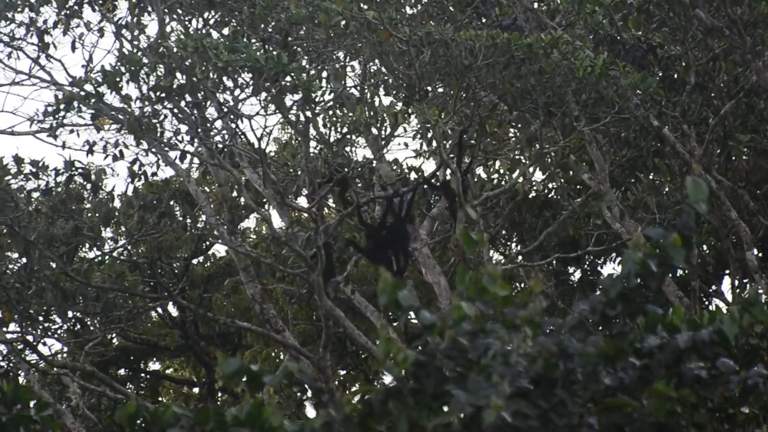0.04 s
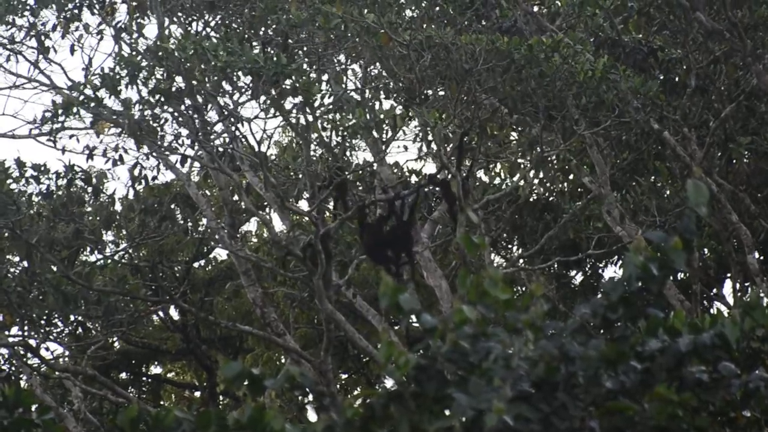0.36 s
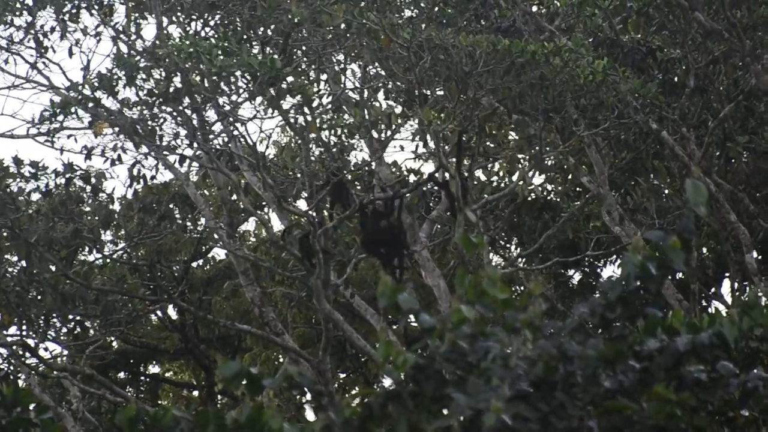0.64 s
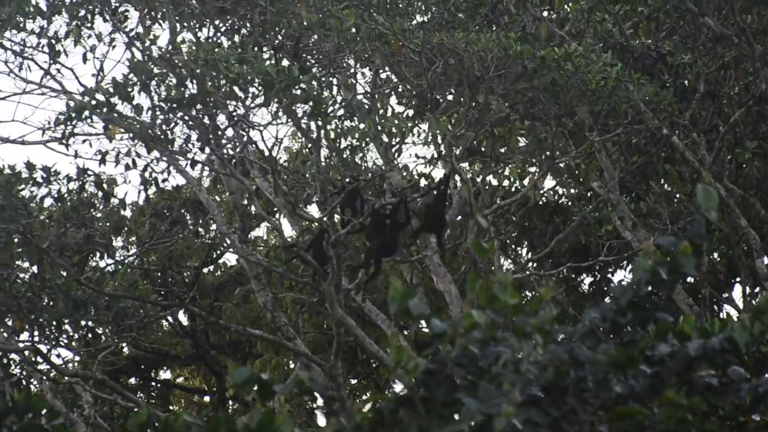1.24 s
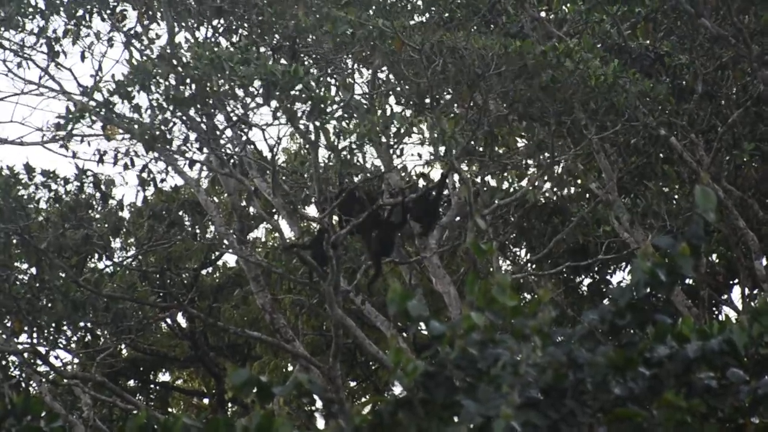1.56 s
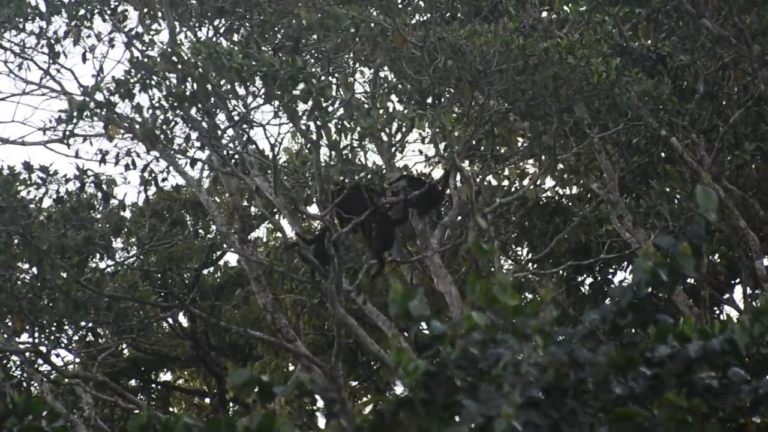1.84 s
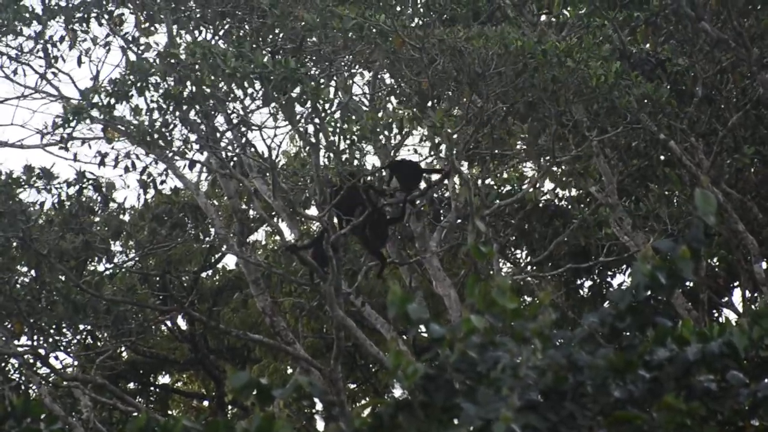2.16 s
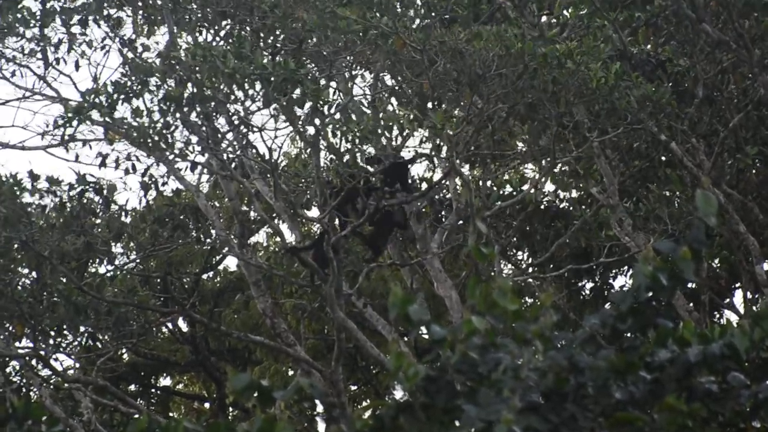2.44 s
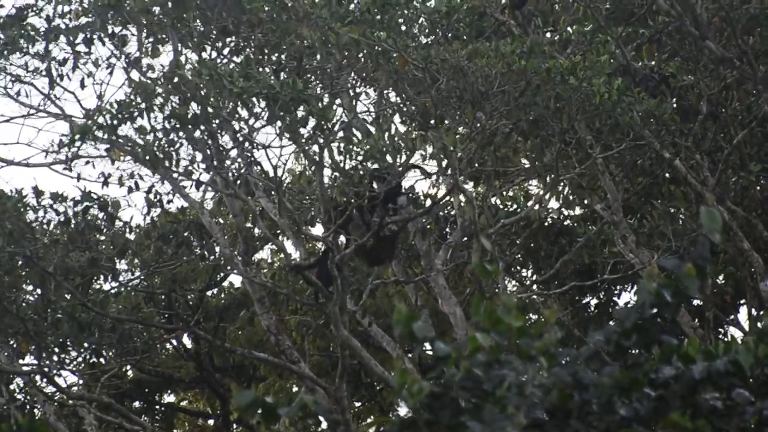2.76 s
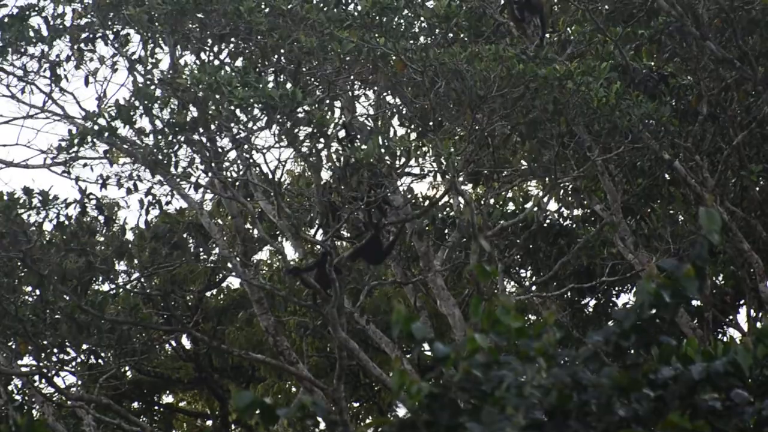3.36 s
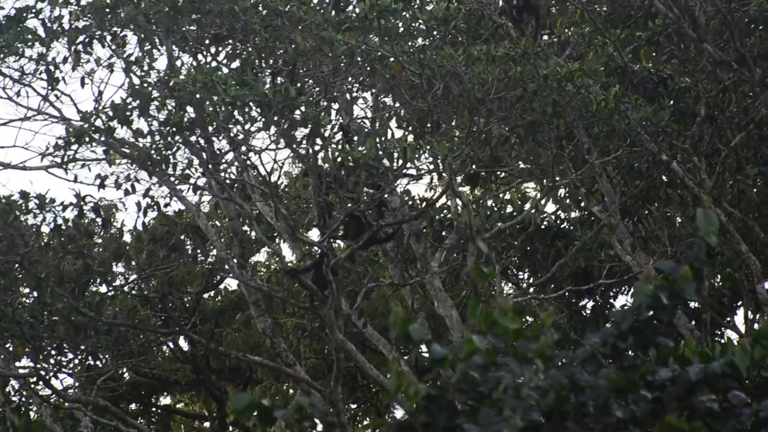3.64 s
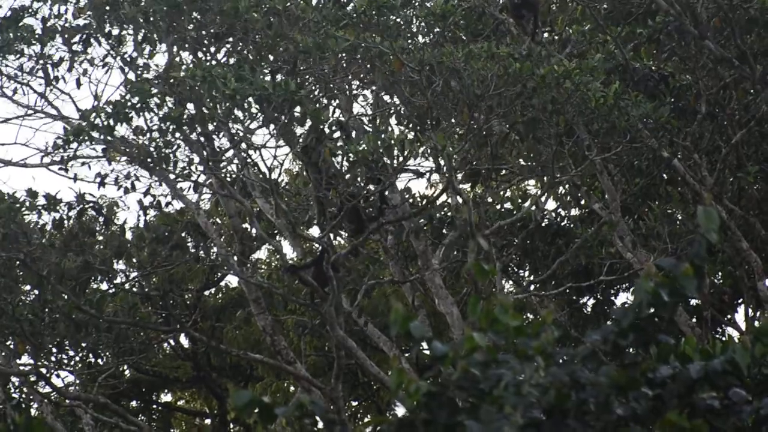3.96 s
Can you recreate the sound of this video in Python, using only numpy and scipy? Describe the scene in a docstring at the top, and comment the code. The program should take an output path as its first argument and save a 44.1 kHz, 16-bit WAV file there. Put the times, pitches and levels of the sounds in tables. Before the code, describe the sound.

Howler monkeys roaring raspily some way off in the trees, with faint bird whistles.

```python
"""Howler monkeys roar in the forest canopy some way off: irregular throat pulses and rushing air ring in
a narrow main resonance, with a rasp above it when the mouth opens. Short yelps lead in, and a second,
broader voice joins in the middle. A bird gives three thin falling whistles, a dull crash rolls
through the trees, two faint tones pass, and the forest hisses throughout."""
import sys
import numpy as np
from scipy import signal
from scipy.fft import rfft, irfft
from scipy.io import wavfile
from scipy.ndimage import uniform_filter1d

SR = 44100
rng = np.random.default_rng(int(sys.argv[2]) if len(sys.argv) > 2 else 0)


def store_wav(level_fs):
    """Save 16-bit WAV to argv[1]."""
    pcm = np.round(np.clip(np.atleast_2d(level_fs), -1, 1) * 32767)
    wavfile.write(sys.argv[1], SR, pcm.T.astype(np.int16))


N = 176400
TIME = np.arange(N) / SR
WOBBLE = .012  # wander of the vocal resonances, as a share of their frequency


def from_db(db):
    """Decibels to gain."""
    return 10 ** (np.asarray(db) / 20)


def unit_rms(x):
    """Scale to rms 1."""
    return x / np.sqrt(np.mean(x ** 2) + 1e-20)


def evened(x):
    """Hold the level steady over about a twentieth of a second."""
    return x / np.sqrt(uniform_filter1d(x ** 2, size=2200) / np.mean(x ** 2) + 1e-6)


def curve(rows, column=1):
    """Automation: straight lines through one column of timed breakpoints."""
    points = np.transpose(rows)
    return np.interp(TIME, points[0], points[column])


def swell(peak_s, width_s, db):
    """A bell-shaped swell of gain."""
    return from_db(db) * np.exp(-.5 * ((TIME - peak_s) / width_s) ** 2)


def drift(rate_hz):
    """Smooth random modulation, rms about 1."""
    hop, settle = 40, 2000
    pole = np.exp(-2 * np.pi * rate_hz * hop / SR)
    noise = rng.standard_normal(N // hop + settle + 2)
    slow = signal.lfilter([1], [1, -2 * pole, pole * pole], noise)[settle:]
    return np.interp(np.arange(N) / hop, np.arange(len(slow)), unit_rms(slow))


def coloured(spectrum):
    """Noise shaped by (frequency [Hz], level [dB]) points, rms 1."""
    hz, db = np.transpose(spectrum)
    bins_hz = np.maximum(np.arange(N // 2 + 1) * SR / N, 1)
    gain = from_db(np.interp(np.log(bins_hz), np.log(hz), db))
    return unit_rms(irfft(rfft(rng.standard_normal(N)) * gain, N))


def resonate(x, hz, width_hz):
    """A steep resonance (one pole, twice) whose centre may glide; rms 1."""
    carrier = np.exp(2j * np.pi * np.cumsum(np.broadcast_to(hz, N)) / SR)
    pole = np.exp(-np.pi * width_hz / SR)
    baseband = signal.lfilter([1], [1, -2 * pole, pole * pole], x * carrier.conj())
    return unit_rms((carrier * baseband).real)


def tract(source, modes, shift=1):
    """A vocal tract: parallel resonances that wobble and shift together."""
    tuning = shift * (1 + WOBBLE * drift(9.2))
    return sum(from_db(db) * resonate(source, hz * tuning, width) for hz, width, db in modes)


def note(centre_s, length_s, hz, db, waver):
    """A short wavering sine under a rounded envelope."""
    envelope = np.sqrt(np.clip(1 - (2 * (TIME - centre_s) / length_s) ** 2, 0, 1))
    phase = 2 * np.pi * np.cumsum(hz * (1 + waver * drift(65.5))) / SR
    return from_db(db) * envelope * np.sin(phase)


def trees(x, wet_db, t60_s=.73):
    """Direct sound plus dense, dying scatter from trunks and leaves."""
    t, wet = TIME[:SR], from_db(wet_db)
    tail = rng.standard_normal(SR) * from_db(-60 * t / t60_s) * (t > .008)
    scatter = signal.fftconvolve(x, tail / np.linalg.norm(tail))[:N]
    return (x + wet * scatter) / np.sqrt(1 + wet ** 2)


def forest():
    """A steady bed of far roaring, leaves and insects."""
    # colour of the bed: (frequency [Hz], relative level [dB])
    spectrum = [(25, -27), (60, -8), (110, 3), (250, 4.5), (400, 0), (700, 0.5), (1000, -2), (1350, -6),
                (1900, -12), (2450, -14), (2900, -9.5), (3400, -23), (4300, -27), (5200, -29.5),
                (6100, -28), (7000, -22.5), (8300, -31), (9400, -29.5), (10500, -24.5), (11500, -33.5),
                (13000, -42.5), (15500, -52)]
    return from_db(-48.5 + 1.2 * drift(1.9)) * coloured(spectrum)


def faint_tones():
    """Two faint tones, one thin and high, one very low."""
    # (centre time [s], length [s], pitch [Hz], level [dB], waver [share of pitch])
    tones = [(0.38, 0.73, 1677, -58.5, 0.0065), (2.88, 0.14, 66, -57, .08)]
    return sum(note(*row) for row in tones)


def crash(start_s=.521, attack_s=.016, level_db=-38):
    """A sudden dull burst smeared by the forest; its deep bass dies first."""
    # colour of the burst: (frequency [Hz], relative level [dB])
    spectrum = [(25, -29), (50, 3), (120, -1), (300, -6.5), (700, -7), (1200, -10), (2000, -14.5),
                (2900, -20.5), (4000, -31.5), (6000, -42), (12000, -66)]
    age, noise = TIME - start_s, coloured(spectrum)

    def decay(hold_s, t60_s):
        return from_db(-60 * np.maximum(age - hold_s, 0) / t60_s)

    bass = signal.sosfiltfilt(signal.butter(2, 110, fs=SR, output="sos"), noise)
    thump = from_db(2.5) * evened(bass) * decay(hold_s=.02, t60_s=.7)
    wash = (noise - bass) * decay(hold_s=.11, t60_s=1)
    return from_db(level_db) * np.clip(age / attack_s, 0, 1) * (thump + wash)


def bird(waver=.00454, flutter_db=3):
    """Three falling whistles, each a fluttering, slightly unsteady sine and its octave."""
    # one contour per whistle: (time [s], pitch [Hz], level [dB])
    whistles = [
        [(.1, 5380, -75), (.13, 5500, -65), (.18, 5210, -70), (.25, 5360, -68.5), (.33, 5260, -64),
         (.355, 5120, -60.5), (.385, 3900, -78)],
        [(.95, 5580, -73), (1.04, 5400, -71), (1.1, 5400, -69), (1.125, 4900, -63), (1.17, 4960, -74),
         (1.225, 4350, -58), (1.265, 4290, -50), (1.3, 4060, -59), (1.32, 3400, -63)],
        [(2.865, 6470, -77), (2.89, 5740, -65), (2.93, 5680, -63), (2.975, 5730, -65.5), (3.008, 4980, -66),
         (3.04, 4990, -61), (3.065, 4800, -77)],
    ]
    # octave of each whistle: (relative level [dB])
    octaves = [-11, -19, -7.5]
    song = np.zeros(N)
    for rows, octave_db in zip(whistles, octaves):
        hz, db = curve(rows, 1), curve(rows, 2)
        gate = np.clip(np.minimum(TIME - rows[0][0], rows[-1][0] - TIME) / .005, 0, 1)
        phase = 2 * np.pi * np.cumsum(hz * (1 + waver * drift(99))) / SR
        level = from_db(db + flutter_db * drift(51))
        song += gate * level * np.sqrt(2) * (np.sin(phase) + from_db(octave_db) * np.sin(2 * phase))
    return song


def larynx(pulse_hz=94.87, jitter=.3, spread_db=3, breath_share=.78):
    """Chaotic pulses of uneven strength, with a puff of turbulent air in each cycle."""
    cycles = np.cumsum(pulse_hz * np.exp(jitter * drift(60))) / SR
    pulses = np.diff(np.floor(cycles), prepend=0) * from_db(spread_db * drift(100))
    air = rng.standard_normal(N) * (1.4 + np.exp(-3 * (cycles % 1)))
    return np.sqrt(1 - breath_share) * unit_rms(pulses) + np.sqrt(breath_share) * unit_rms(air)


def second_voice():
    """Another larynx and tract: a broader, higher roar that swells in the middle."""
    # envelope: (time [s], level [dB])
    levels = [(1.55, -73), (1.66, -47.5), (1.8, -54), (1.92, -48.5), (2.03, -49), (2.12, -41), (2.22, -37),
              (2.3, -40), (2.38, -46), (2.55, -44.5), (2.7, -78), (2.9, -72)]
    # resonances before the glide: (frequency [Hz], width [Hz], gain [dB])
    modes = [(952, 87, -10), (1430, 180, 3.5), (1564, 80, -3.5), (3065, 380, -11), (3445, 180, -14.5)]
    # glide of the resonances: (time [s], frequency factor [ratio])
    glide = [(1.6, 1.19), (1.85, 0.95), (2.0, 1.05), (2.12, 0.98), (2.25, 1.016), (2.33, 0.89), (2.55, .95)]
    return from_db(curve(levels)) * evened(tract(larynx(), modes, curve(glide)))


def yelps():
    """Short clear yelps that lead into the roar."""
    # (centre time [s], length [s], pitch [Hz], level [dB])
    calls = [(0.883, 0.032, 1208, -41.5), (0.978, 0.047, 1205, -45), (1.141, 0.033, 1216, -43),
             (1.23, 0.022, 1199, -37.5), (1.277, 0.047, 1230, -35.5), (1.338, 0.044, 1650, -42)]
    return sum(note(*row, waver=.0234) for row in calls)


def grunt(source):
    """Low resonances give a rough grunt as the last roar starts."""
    # (frequency [Hz], width [Hz], gain [dB])
    modes = [(183, 66, 7.5), (312, 140, -5), (520, 260, 1)]
    return swell(peak_s=3.51, width_s=.04, db=-52) * evened(tract(source, modes))


def hiss():
    """Air rushes through high resonances at the peaks of the roar."""
    # (peak time [s], width [s], relative level [dB])
    peaks = [(1.655, 0.048, -58.5), (1.97, 0.17, -62.5), (2.75, 0.27, -69.5), (3.92, 0.14, -69)]
    # (frequency [Hz], width [Hz], gain [dB])
    modes = [(5100, 350, -6.5), (5600, 550, -3), (7160, 2000, -3.5)]
    return sum(swell(*row) for row in peaks) * tract(rng.standard_normal(N), modes)


def edge(source):
    """The rasp's bright edge, which comes out at the height of each roar."""
    # envelope: (time [s], level [dB])
    levels = [(0, -80), (1.28, -97), (1.35, -63.5), (1.52, -62), (1.6, -57.5), (1.64, -55.5), (1.74, -63),
              (2.02, -64), (2.1, -57), (2.26, -54), (2.36, -65), (2.55, -67), (2.78, -65), (2.87, -59),
              (2.93, -66), (3.0, -79), (3.4, -92), (3.6, -67.5), (3.79, -71), (3.84, -62), (3.9, -60.5),
              (4, -68)]
    # resonances: (frequency [Hz], width [Hz], gain [dB])
    modes = [(3683, 160, 0), (3877, 200, 1), (4260, 400, -6.5)]
    return from_db(curve(levels)) * evened(unit_rms(tract(source, modes)))


def rasp(source, top_hz=3250, trim_db=2):
    """The open mouth adds broad midrange resonances, cut off steeply on top."""
    # envelope: (time [s], relative level [dB])
    levels = [(0, -65), (.2, -58.5), (.35, -68), (.85, -69.5), (1.2, -68), (1.28, -53.5), (1.33, -48.5),
              (1.5, -47), (1.63, -43.5), (1.75, -51), (1.9, -53), (2.1, -50), (2.25, -46.5), (2.4, -45.5),
              (2.6, -46.5), (2.88, -43.5), (3.02, -54.5), (3.2, -62), (3.42, -65), (3.46, -49), (3.6, -47),
              (3.74, -41), (3.9, -41), (4, -43)]
    # resonances: (frequency [Hz], width [Hz], gain [dB])
    modes = [(859, 182, -0.5), (1413, 240, -5), (1678, 320, 2), (2410, 250, -0.5), (2848, 280, -3.5),
             (3060, 200, -13.5)]
    band = signal.sosfilt(signal.butter(10, top_hz, fs=SR, output="sos"), tract(source, modes))
    return from_db(curve(levels) + trim_db) * evened(unit_rms(band))


def rings(source, throb_db=2.5, trim_db=.5):
    """Narrow resonances ring and throb at the top of each roar."""
    # envelope: (time [s], relative level [dB])
    levels = [(0, -57.5), (.25, -63), (.4, -80), (1.252, -65), (1.38, -49.5), (1.52, -50), (1.64, -41.5),
              (1.8, -63.5), (2.1, -55.5), (2.23, -39.5), (2.35, -53), (2.601, -46), (2.73, -41), (2.9, -40),
              (3.02, -69), (3.42, -75), (3.46, -52.5), (3.7, -48.5), (3.83, -46.5), (4, -49)]
    # resonances: (frequency [Hz], width [Hz], gain [dB])
    modes = [(2019, 153, 1.5), (2336, 136, -1), (2548, 230, -9)]
    ringing = evened(unit_rms(tract(source, modes)))
    return from_db(curve(levels) + trim_db + throb_db * drift(22)) * ringing


def throat(source, width_hz=156, trim_db=-1.5):
    """The core of the roar: one narrow throat resonance near 1.2 kHz."""
    # vocal effort: (time [s], relative level [dB])
    effort = [(0, -44), (.15, -44.5), (.3, -56), (.42, -61), (.84, -67), (.89, -46), (.97, -48),
              (1.05, -62), (1.19, -53.5), (1.26, -42), (1.37, -43.5), (1.42, -34.5), (1.55, -32.5),
              (1.66, -35.5), (1.74, -44.5), (2.0, -44.5), (2.06, -41.5), (2.24, -43), (2.29, -33.5),
              (2.38, -44), (2.56, -37), (2.86, -38), (2.96, -43), (3.24, -51.5), (3.41, -46), (3.55, -34.5),
              (3.64, -35.5), (3.71, -43), (3.8, -38), (3.96, -34), (4, -32.5)]
    # centre of the resonance: (time [s], frequency [Hz])
    centre = [(0, 1167), (.25, 1167), (.9, 1180), (1.278, 1200), (1.5, 1187), (1.701, 1161), (2.1, 1214),
              (2.3, 1230), (2.55, 1235), (2.85, 1225), (3.2, 1166), (3.58, 1232), (3.8, 1250), (4, 1206)]
    hz = curve(centre) * (1 + WOBBLE * drift(15.4))
    return from_db(curve(effort) + trim_db) * evened(resonate(source, hz, width_hz))


def roar(flutter_db=1.55):
    """The lead monkey: one fluttering larynx drives every voiced layer, with hiss on top."""
    source = larynx() * from_db(flutter_db * drift(19))
    return throat(source) + rings(source) + rasp(source) + edge(source) + hiss() + grunt(source)


def scene():
    """Monkeys, their calls cut off steeply above about 6.6 kHz, and a bird among the trees, over the crash and
    the forest bed."""
    treble_cut = signal.butter(4, 6600, fs=SR, output="sos")
    calls = signal.sosfilt(treble_cut, roar() + second_voice() + yelps() + faint_tones())
    return (trees(calls, wet_db=-4.5) + trees(bird(), wet_db=-2) + crash() + forest())[None]


def record(dry, whine_hz=15677, whine_db=-85, cutoff_hz=15750):
    """A faint electronic whine is added and the top is cut."""
    whine = from_db(whine_db) * np.sqrt(2) * np.sin(2 * np.pi * whine_hz * TIME)
    return signal.sosfilt(signal.ellip(12, .1, 80, cutoff_hz, fs=SR, output="sos"), dry + whine)


dry = scene()
out = record(dry)
store_wav(out)
```